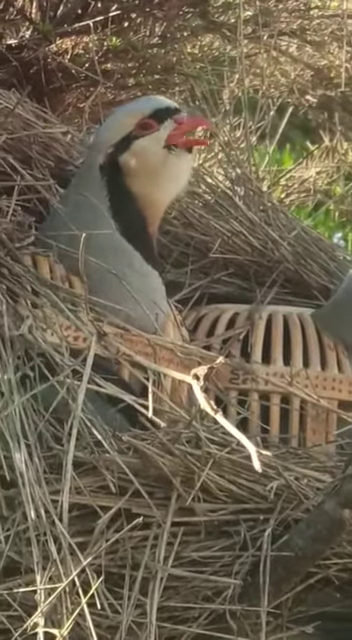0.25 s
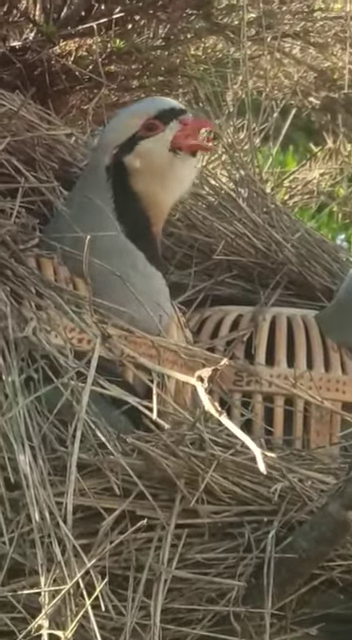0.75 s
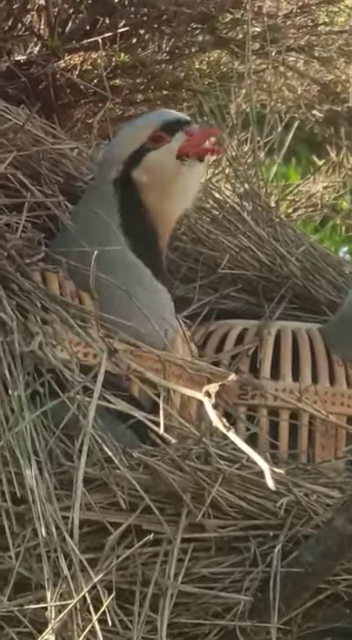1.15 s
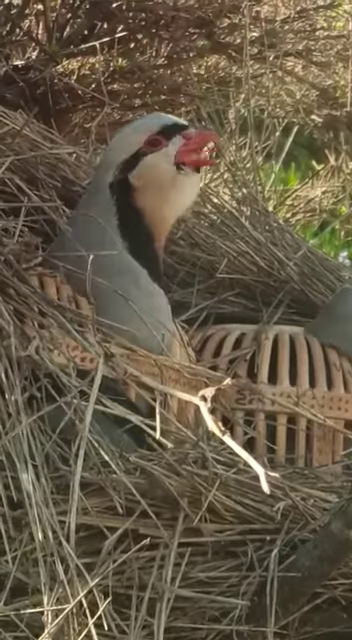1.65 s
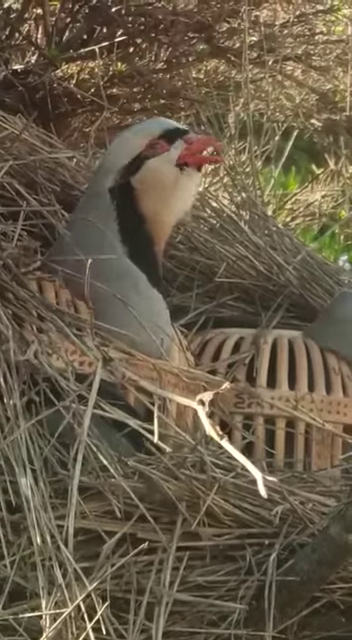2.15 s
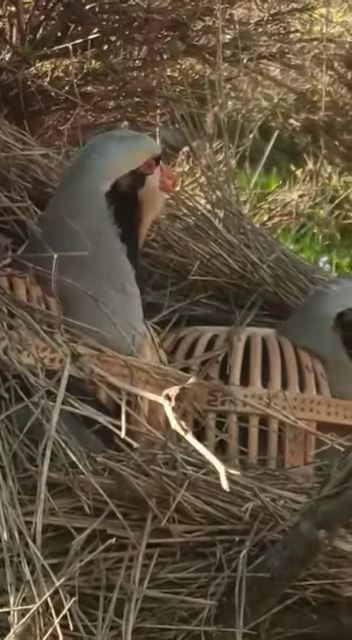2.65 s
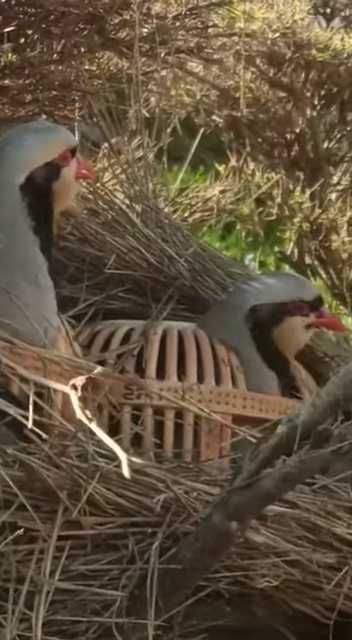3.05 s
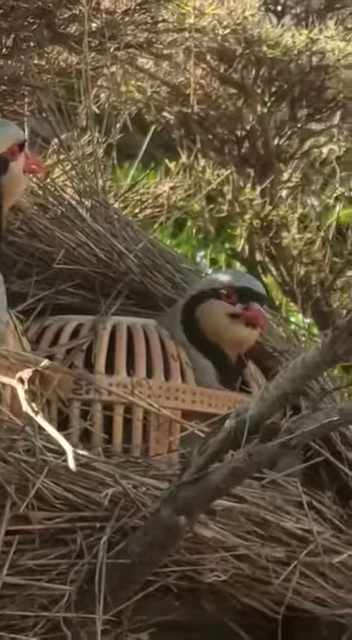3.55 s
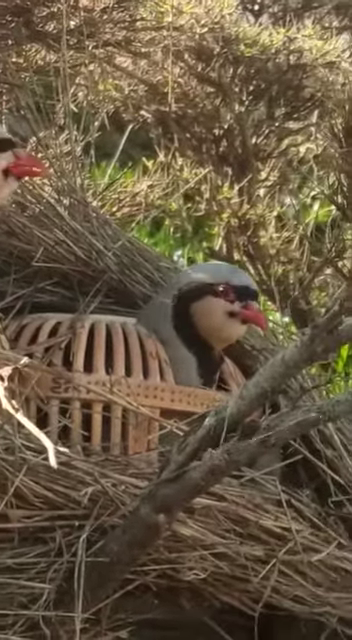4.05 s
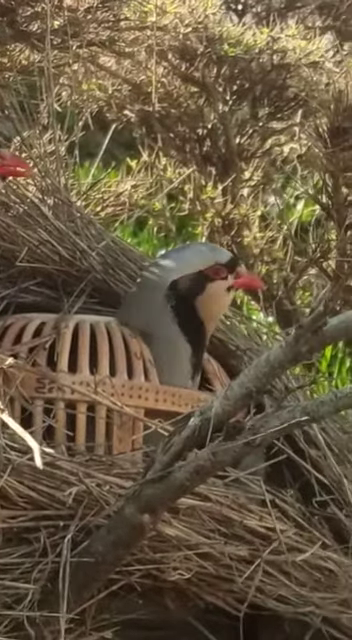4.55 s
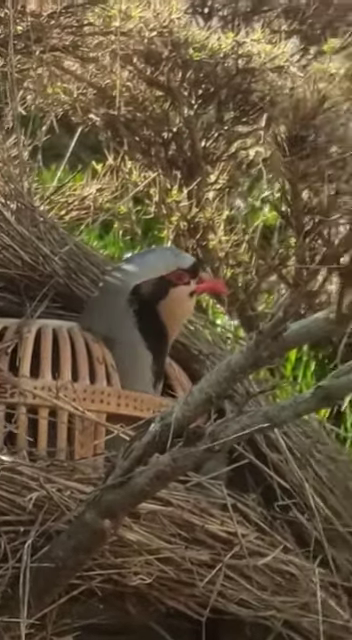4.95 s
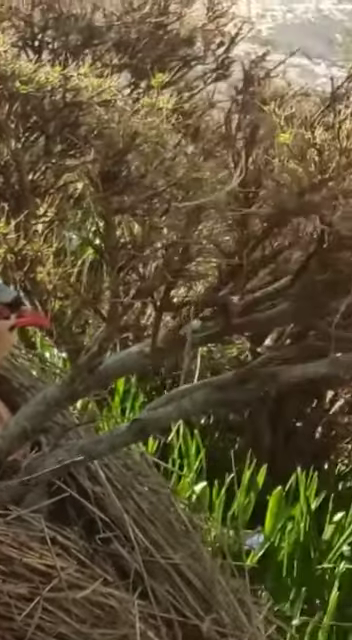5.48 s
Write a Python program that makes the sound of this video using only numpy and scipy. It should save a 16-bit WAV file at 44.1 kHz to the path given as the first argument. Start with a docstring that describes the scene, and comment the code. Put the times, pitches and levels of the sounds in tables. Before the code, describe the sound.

From 0 to 1.9 s a nearby partridge fires loud, hollow, throaty chucks, each under a tenth of a second, evenly spaced at nearly six per second; mid-run notes get a rougher upward push before falling. Low breeze rumbles softly underneath, fading by 2 s. Around 1.9-2.4 s the rhythm breaks into grunts, a rising growl, one more strong chuck and a weaker one. At 2.6-2.9 s comes a quiet growl climbing into a cackle. Small yelps and squeals at 2.9-3.3 s and low chatter near 3.5 s follow. From 3.8 s the second bird calls at about 3.8, 4.2, 4.6, 5.1 and 5.4 s: scratchy rasp, warbling squeal, yelp, falling hoarse buzz. A soft cluck sits near 4.95 s. Very faint distant pips occur after 4.4 s; straw rustles lightly at the end. The space is open and dry, with tight reflections from twigs and cage slats.

```python
"""A dry hillside with two chukar partridges: the near cock fires loud hollow chucks that slow into growls.
The second bird answers with rasps that break into squealing whistles, and soft clucks.
Each voice is a train of syrinx pulses filtered by throat and bill; squeals are warbling sines with undertones.
Cage slats, twigs and scrub reflect the calls; distant birds pip, straw rustles and a light breeze rumbles.
A microphone filter and a fast limiter, which holds down the loudest notes, follow."""
import sys
import numpy as np
from scipy import signal
from scipy.fft import rfft, irfft
from scipy.io import wavfile
from scipy.ndimage import uniform_filter1d, minimum_filter1d, map_coordinates

SR = 44100
rng = np.random.default_rng(int(sys.argv[2]) if len(sys.argv) > 2 else 0)


def to_wav(sig):
    """Store sig (one row per channel, or 1-D mono) as 16-bit WAV at the path in sys.argv[1].

    Samples outside -1..1 are clipped; the rate is SR.
    """
    pcm = np.clip(np.atleast_2d(sig), -1, 1) * 32767
    pcm = np.round(pcm).astype(np.int16)
    wavfile.write(sys.argv[1], SR, pcm.T)  # frames by channels


N = 252252  # samples
TOP_HZ = 15800  # upper band limit


def amp(db):
    """Decibel law: a level in dB becomes an amplitude ratio."""
    return 10 ** (np.asarray(db) / 20)


def unit(x):
    """Normalisation to an rms of one."""
    return x / np.sqrt(np.mean(x ** 2) + 1e-20)


def wobble(count, rate):
    """Band-limited fluctuation: a smooth random curve with rate knots a second."""
    knots = rng.standard_normal(int(count * rate / SR) + 4)
    return map_coordinates(knots, [np.arange(count) * rate / SR], mode="mirror")


def colour(x, points, size=2048):
    """Minimum-phase resonance: a causal filter through (Hz, dB) points, whose peaks ring after each pulse."""
    hz, db = np.transpose(points)
    shape = np.interp(np.log(np.fft.rfftfreq(size, 1 / SR) + 1), np.log(hz), db)
    # folding the cepstrum onto positive times makes the filter causal
    cepstrum = irfft(np.log(amp(uniform_filter1d(shape, size=5))))
    cepstrum[1:size // 2] *= 2
    cepstrum[size // 2 + 1:] = 0
    impulse_response = irfft(np.exp(rfft(cepstrum)))
    return signal.fftconvolve(x, impulse_response)


def add(track, s, sound, length, db):
    """Superposition: lay a note into the track at s seconds, scaled to its rms level over its length."""
    sound = sound * amp(db) / np.sqrt(np.sum(sound ** 2) / (length * SR))
    start = round(s * SR)
    sound = sound[max(-start, 0):N - start]
    track[max(start, 0):][:len(sound)] += sound


def swell(u, attack, release):
    """Pressure envelope: air opens and closes the note over the given shares of its length."""
    nearest_end = np.minimum(u / attack, (1 - u) / release)
    return np.sin(np.pi / 2 * np.clip(nearest_end, 0, 1))


def arch(u, middle, sweep):
    """Pressure-dependent pitch: a glide that sags at both ends, where the pressure is low."""
    return middle * (1 - 0.27 * (u - .5) ** 2) + sweep * (u - .5)


def syrinx(pitch, rough, pressure, doubling=0):
    """Membrane oscillation: one smeared pulse a cycle, duller at weak pressure, with optional period doubling.

    Roughness shakes the pitch, beads the level and frays the upper harmonics.
    """
    count = len(pitch)
    jitter = 1 + .11 * rough * wobble(count, 260)
    phase = 2 * np.pi * np.cumsum(pitch * jitter) / SR
    k = np.arange(1, int(TOP_HZ / pitch.min()) + 1)[:, None]
    hz = k * pitch
    # each harmonic trades its steady part for a random one
    fray = np.minimum(rough * np.sqrt(hz / 1300), 1)
    chaos = np.array([wobble(count, 380) + 1j * wobble(count, 380) for _ in k]) / np.sqrt(2)
    smear = rng.normal(0, 1.2, k.shape)  # radians
    carrier = np.exp(1j * (k * phase + smear))
    harmonics = np.real((np.sqrt(1 - fray ** 2) + fray * chaos) * carrier)
    loudness = pressure ** (1 + np.minimum(hz / 7000, 1))
    flutter = amp((1 + 2 * rough) * wobble(count, 240))
    # doubling makes alternate cycles unequal in fits
    depth = 2 * doubling * rough * (1 + .5 * wobble(count, 300))
    alternate = 1 + depth * np.cos(phase / 2 + wobble(count, 300))
    return flutter * alternate * np.sum(harmonics * loudness * (hz < TOP_HZ), axis=0)


def syllables(rows, throat, attack, release, doubling=0):
    """Source-filter voice: short hoarse glides through a throat, brighter the harder the bird pushes."""
    track = np.zeros(N)
    for s, length, db, middle, sweep, rough in rows:
        u = np.linspace(0, 1, int(length * SR))
        pressure = swell(u, attack, release) * amp(db + 6.5)
        source = syrinx(arch(u, middle, sweep), rough, pressure, doubling)
        add(track, s, colour(source, throat), length, db)
    return track


# the cock's run of chucks: start_s, length_s, level_db
CHUCK_NOTES = [(-.036, 0.062, -12.5), (0.141, 0.047, -4.5), (0.303, 0.056, -6.5), (0.475, 0.073, -6.5),
               (0.656, 0.069, -7.5), (0.831, 0.078, -8), (1.013, 0.076, -7.5), (1.189, 0.078, -8),
               (1.371, 0.076, -8), (1.545, 0.076, -9.5), (1.719, 0.072, -6.5), (1.893, 0.049, -9.5),
               (2.197, 0.041, -4.5), (2.381, 0.041, -15.5)]
# course of one chuck: place (0-1), pitch (ratio to held pitch), effort_db, roughness (0-1, before the push)
CHUCK_COURSE = [(0, .95, -8, .8), (.14, 1, 0, .55), (.28, 1.01, 0, .25), (.55, 1.01, 0, .16),
                (.73, .97, -.5, .14), (.84, .83, -7, .2), (1, .53, -12, .3)]
# over the run the push comes later in the note and grows, then he tires:
# start_s, held_pitch_hz, lift_hz, push_place (0-1)
CHUCK_RUN = [(0, 415, 25, .14), (.66, 422, 30, .16), (.83, 412, 80, .44), (1.72, 412, 110, .5),
             (1.89, 400, 30, .2), (2.2, 405, 20, .1), (2.38, 372, 20, .2)]
# hollow resonances of throat and bill: frequency_hz, gain_db
HOLLOW_THROAT = [(200, -13.5), (440, -21.5), (600, -15.5), (850, -4.5), (1060, 1.5), (1200, 13),
                 (1320, 4.5), (1570, -24.5), (2250, -29), (3100, -24), (3980, -2), (4300, -19.5),
                 (5200, -48), (6500, -7.5), (7500, -36)]
# resonances of the tightened throat: frequency_hz, gain_db
TIGHT_THROAT = [(250, -20), (560, -16), (820, 3.5), (1150, -4), (1330, -4), (1650, -30.5), (2600, -17),
                (3050, -15), (3500, -3), (4100, -2.5), (5200, -39), (6650, -1.5), (7900, -32)]
FALL_AT, FALL_S = .7, 0.025  # place where the closing fall starts; its time, the same in every chuck
PUSH_CHOKE_DB_PER_HZ = .02


def chucks():
    """Resonance tuning: a harmonic booms on the lowest throat peak until a rough push lifts it off and tightens."""
    track = np.zeros(N)
    place, *course = np.transpose(CHUCK_COURSE)
    times, *run = np.transpose(CHUCK_RUN)
    for s, length, db in CHUCK_NOTES:
        held_hz, lift_hz, push_at = (np.interp(s, times, c) for c in run)
        t = np.arange(0, length, 1 / SR)
        u = np.interp(t, [0, length - FALL_S, length], [0, FALL_AT, 1])
        bend, effort_db, rough = (np.interp(u, place, c) for c in course)
        lift = lift_hz * np.exp(-((u - push_at) / 0.14) ** 2)
        pressure = swell(u, 0.07, 0.03) * amp(effort_db - PUSH_CHOKE_DB_PER_HZ * lift)
        source = syrinx(held_hz * bend + lift, rough + 2 * lift / held_hz, pressure)
        tight = np.clip(lift / 170, 0, 1)
        voice = colour(source * (1 - tight), HOLLOW_THROAT) + colour(source * tight, TIGHT_THROAT)
        add(track, s, voice, length, db)
    return track


# resonances of the relaxed throat: frequency_hz, gain_db
RELAXED_THROAT = [(300, -23.5), (560, -15.5), (800, 7), (1350, 0.5), (1650, -22), (2500, -14),
                  (2900, -18.5), (3450, -10.5), (4650, -7), (5500, -30.5), (6600, -2.5), (7900, -24.5)]
RELAX_AT_S = 2.5


def throat_at(s):
    """Wall tension: the cock's throat stays tight through the run of chucks, and relaxes after it."""
    return TIGHT_THROAT if s < RELAX_AT_S else RELAXED_THROAT


# the cock's short grunts: start_s, length_s, level_db, pitch_hz (mid-note)
GRUNT_NOTES = [(1.925, 0.032, -20.5, 337), (2.036, .024, -24.5, 391), (2.068, .037, -27, 371.4),
               (2.566, 0.031, -27.5, 396), (3.605, .037, -28, 541)]
# drawn-out growls, then a short cackle, one curve each: time_s, pitch_hz, level_db, roughness (0-1)
GROWL_CURVES = [
    [(2.106, 385, -17.5, .7), (2.21, 503.2, -10.5, 0.8)],
    [(2.607, 380, -28, .6), (2.69, 400, -21.5, .42), (2.735, 470, -20.5, .65), (2.77, 620, -20.5, .6),
     (2.82, 660, -21.5, .42), (2.835, 800, -27, .15), (2.856, 590, -18, .25), (2.872, 470, -33, .3)],
    [(3.417, 527, -25.5, 0.4), (3.429, 596, -20.5, 0.5), (3.443, 527, -19.5, 0.3), (3.462, 557, -34.5, 0.4)],
]
# resonances of the throat behind a nearly shut bill: frequency_hz, gain_db
SHUT_BILL = [(250, -19.5), (560, -6), (760, 6), (1000, -5.5), (1350, -4), (1650, -24.5), (4200, -11),
             (5200, -17.5), (7000, -21.5)]
# pitches between which the bill opens: pitch_hz
BILL_OPENING_HZ = [400, 500]
GRUNT_SWEEP_HZ, GRUNT_ROUGH = -39, .55


def growls():
    """Irregular vibration: grunts, growls and cackle, rough and low, with a bill that opens as pitch climbs."""
    track = np.zeros(N)
    for s, *note in GRUNT_NOTES:
        row = (s, *note, GRUNT_SWEEP_HZ, GRUNT_ROUGH)
        track += syllables([row], throat_at(s), attack=0.87, release=0.22)
    for curve in GROWL_CURVES:
        s, hz, db, rough = np.transpose(curve)
        t = np.arange(s[0], s[-1], 1 / SR)
        level_db = np.interp(t, s, db)
        pressure = swell(np.linspace(0, 1, len(t)), 0.031, 0.018) * amp(level_db + 9.5)
        pitch = np.interp(t, s, hz)
        source = syrinx(pitch, np.interp(t, s, rough), pressure)
        # only after the throat relaxes does the bill follow the pitch
        opening = np.interp(pitch, BILL_OPENING_HZ, [0, 1]) if s[0] > RELAX_AT_S else 1
        voice = colour(source * opening, throat_at(s[0])) + colour(source * (1 - opening), SHUT_BILL)
        add(track, s[0], voice, s[-1] - s[0], level_db.mean())
    return track


def steps(rows, shape):
    """Register change: stretch one sequence of registers over each rasp."""
    return [(s + start * length, share * length, db + step_db, *voice)
            for s, length, db in rows
            for start, share, step_db, *voice in shape]


# the second bird's opening rasps: start_s, length_s, level_db (before the step level)
OPENING_RASPS = [(3.814, .036, -19.5), (4.155, .033, -19), (4.552, .04, -16), (5.076, 0.017, -28),
                 (5.386, 0.025, -20), (5.543, 0.024, -17.5)]
# an opening climbs in two steps:
# start (share of length), length (share), step_level_db, pitch_hz (mid-note), sweep_hz, roughness (0-1)
OPENING_STEPS = [(0, 0.73, -3, 682, 74.9, 0.5), (0.481, 0.47, -0.5, 842.6, 186.6, 0.3)]
# closing rasps: start_s, length_s, level_db (before the step level)
CLOSING_RASPS = [(1.113, 0.026, -35), (2.974, 0.028, -30.5), (3.303, 0.046, -29.5), (3.932, 0.047, -19),
                 (4.322, 0.046, -19.5), (4.711, 0.049, -17.5), (5.156, 0.066, -22.5), (5.565, 0.054, -18.5)]
# a closing drops from a harsh register to a clear falling buzz:
# start (share of length), length (share), step_level_db, pitch_hz (mid-note), sweep_hz, roughness (0-1)
CLOSING_STEPS = [(0, .68, -1, 640, -60, .55), (.4, .7, 0, 415, -70, .27)]
# chatter between calls: start_s, length_s, level_db
CHATTER_NOTES = [(3.456, .05, -33.5), (3.5, .026, -29.5), (3.523, 0.023, -22), (3.548, .023, -21.5),
                 (3.583, 0.018, -27.5)]
# yelps sliding up from one pitch: start_s, length_s, level_db, end_hz (before the sag at both ends)
YELP_NOTES = [(2.911, 0.024, -20, 1920), (2.952, 0.023, -29.5, 1430), (3.183, .024, -21, 1957),
              (3.272, 0.018, -27.5, 1566), (3.901, 0.057, -25, 1355), (4.304, 0.031, -17.5, 1727),
              (4.697, .018, -15.5, 1794), (5.083, .02, -21.5, 1585), (5.13, 0.027, -23, 1683),
              (5.407, .016, -15, 1980)]
# harsh resonances of the second bird's throat: frequency_hz, gain_db
HARSH_THROAT = [(400, -22.5), (620, -9.5), (860, -15.5), (1350, -1), (1560, -13.5), (2050, 4), (2650, -2),
                (3400, 5), (4150, 4), (5100, -12.5), (6800, -2.5), (8000, -12.5)]
# the same throat as its bill closes: frequency_hz, gain_db
BUZZ_THROAT = [(380, -11.5), (600, -16), (860, 1.5), (1260, -3.5), (1600, -12.5), (2080, 4.5), (2550, -9.5),
               (3350, 2.5), (4100, -0.5), (5100, -17), (6900, -6), (8000, -18)]
CHATTER_HZ, CHATTER_SWEEP_HZ, CHATTER_ROUGH = 680, 110, .45
YELP_START_HZ, YELP_ROUGH = 1270, .5  # start before the sag


def rasps():
    """Period doubling: harsh openings and yelps alternate their cycles; closings and chatter only buzz."""
    openings = steps(OPENING_RASPS, OPENING_STEPS)
    closings = steps(CLOSING_RASPS, CLOSING_STEPS)
    chatter = [(*row, CHATTER_HZ, CHATTER_SWEEP_HZ, CHATTER_ROUGH) for row in CHATTER_NOTES]
    yelps = [(s, length, db, (YELP_START_HZ + end_hz) / 2, end_hz - YELP_START_HZ, YELP_ROUGH)
             for s, length, db, end_hz in YELP_NOTES]
    return (syllables(openings + yelps, HARSH_THROAT, attack=0.58, release=.22, doubling=.4)
            + syllables(closings, BUZZ_THROAT, attack=0.18, release=0.28)
            + syllables(chatter, BUZZ_THROAT, attack=0.49, release=.2))


# squeals arching up and back: start_s, length_s, level_db, top_hz (before the sag), undertones_db
SQUEAL_NOTES = [(2.925, .024, -19.5, 2644, 2.5), (3.212, .023, -25, 2640, -31),
                (3.244, .018, -28.5, 2540, -29), (3.839, 0.064, -25.5, 2700, -3.5),
                (4.18, 0.03, -19.5, 2833, -16), (4.224, 0.052, -24.5, 2680, -6),
                (4.288, .019, -20.5, 2530, -4), (4.587, 0.016, -15.5, 3785, -13),
                (4.605, 0.058, -23, 2666, -2), (4.674, .017, -20.5, 2620, -3),
                (5.1, 0.025, -16.5, 3683, -24), (5.41, 0.067, -22.5, 2633, -16.5),
                (5.485, 0.018, -21, 2647, -13), (5.513, .021, -17, 2620, -33)]
SQUEAL_EDGE_HZ, SQUEAL_GLIDE_S = 2100, .009  # pitch at both ends before the sag; time to glide
SQUEAL_SAG_HZ_PER_S, SQUEAL_FADE_DB_PER_S = 3200, 70


def squeals():
    """Subharmonics: a warbling squeal sags, fades and, as it tires, repeats every third swing as undertones."""
    track = np.zeros(N)
    thirds = [(1, -18), (2, 0), (4, -5), (5, -7), (7, -18), (8, -15)]  # (multiple of pitch / 3, dB)
    for s, length, db, top_hz, under_db in SQUEAL_NOTES:
        count = int(length * SR)
        u = np.linspace(0, 1, count)
        glide = SQUEAL_GLIDE_S / length
        rise = (top_hz - SQUEAL_EDGE_HZ) * swell(u, glide, glide)
        pitch = SQUEAL_EDGE_HZ + rise - SQUEAL_SAG_HZ_PER_S * length * (u - .5)
        warble = 1 + .018 * wobble(count, 90) + .012 * wobble(count, 700)
        phase = 2 * np.pi * np.cumsum(pitch * warble) / SR
        tone = np.sin(phase) + amp(-13) * np.sin(2 * phase) + amp(-20) * np.sin(5 * phase)
        under = np.zeros(count)
        for k, level_db in thirds:
            fitful = amp(level_db + 4 * wobble(count, 130))
            under += fitful * np.sin(k * phase / 3 + k / 4 * wobble(count, 300))
        growing_under = amp(under_db) * under * np.sin(np.pi / 2 * u)
        hiss = unit(colour(rng.standard_normal(count), HARSH_THROAT)[:count])
        fade_db = 1.5 * wobble(count, 110) - SQUEAL_FADE_DB_PER_S * length * u
        pressure = swell(u, glide, glide) * amp(fade_db)
        add(track, s, (tone + growing_under + amp(-15) * hiss) * pressure, length, db)
    return track


# soft clucks: start_s, length_s, level_db
CLUCK_NOTES = [(4.909, 0.033, -32.5), (4.96, 0.035, -21), (5.615, 0.045, -36)]
CLUCK_HZ, CLUCK_ROUGH = 439.6, 0.57  # mid-note pitch; roughness 0-1


def clucks():
    """Closed-tract filtering: soft notes without a sweep, through a nearly shut bill."""
    rows = [(*row, CLUCK_HZ, 0, CLUCK_ROUGH) for row in CLUCK_NOTES]
    return syllables(rows, SHUT_BILL, attack=0.62, release=0.078)


CAGE_DELAY_S, CAGE_DB = .00135, -14.5


def cage(voices):
    """Comb filtering: slats beside the birds throw back the treble, which cuts a row of notches into it."""
    highpass = signal.butter(2, 1900, "high", fs=SR, output="sos")
    treble = signal.sosfiltfilt(highpass, voices)
    reflection = np.pad(treble, (round(CAGE_DELAY_S * SR), 0))[:N]
    return voices - amp(CAGE_DB) * reflection


def hillside(voices):
    """Diffuse reflection: twigs and straw close by scatter the calls; the scrub beyond adds a faint echo."""
    t = np.arange(SR // 2) / SR
    scatter = unit(rng.standard_normal(len(t)) * t * amp(-60 * t / 0.023))
    echo = unit(rng.standard_normal(len(t)) * amp(-60 * t / 0.23))  # falls 60 dB in 0.23 s
    response = (amp(-13.5) * scatter + amp(-39.5) * echo) / np.sqrt(len(t))
    return signal.fftconvolve(voices, response)[:N]


# small birds far off: start_s, length_s, level_db, first_hz, last_hz
PIP_NOTES = [(4.375, 0.057, -56.5, 4750, 4350), (4.998, .065, -46.5, 8500, 5460),
             (5.232, .07, -69, 3460, 2750)]


def pips():
    """Frequency glide: distant small birds as thin falling sines."""
    track = np.zeros(N)
    for s, length, db, first, last in PIP_NOTES:
        pitch = np.geomspace(first, last, int(length * SR))
        tone = np.sin(2 * np.pi * np.cumsum(pitch) / SR)
        add(track, s, tone * np.hanning(len(pitch)), length, db)
    return track


# course of the straw's rustle: time_s, level_db (before the uneven flutter)
RUSTLE_COURSE = [(5.58, -62), (5.72, -39)]
# spectrum of dry straw: frequency_hz, relative density (dB per Hz)
STRAW_SPECTRUM = [(300, -8.5), (2000, -3.5), (7000, -19)]


def rustle():
    """Friction noise: a soft uneven swish of dry straw, as shaped noise."""
    level_db = np.interp(np.arange(N) / SR, *np.transpose(RUSTLE_COURSE)) + 2.5 * wobble(N, 80)
    return amp(level_db) * unit(colour(rng.standard_normal(N), STRAW_SPECTRUM)[:N])


# spectrum of the outdoor hush: frequency_hz, relative density (dB per Hz)
HUSH_SPECTRUM = [(38, -31), (72, 8), (130, -3.5), (350, -12), (1250, -20.5), (2000, -41), (6500, -37.5)]
# course of the breeze: time_s, level_db
BREEZE_COURSE = [(0, -31.5), (1.5, -37), (2, -62)]


def air():
    """Turbulence noise: a steady outdoor hush, and lumps of breeze rumbling on the microphone."""
    hush = amp(-45.0) * unit(colour(rng.standard_normal(N), HUSH_SPECTRUM)[:N])
    low_band = signal.butter(3, [75, 180], "band", fs=SR, output="sos")
    rumble = signal.sosfilt(low_band, rng.standard_normal(N))
    breeze_db = np.interp(np.arange(N) / SR, *np.transpose(BREEZE_COURSE))
    return hush + amp(breeze_db) * unit(rumble * amp(5.1 * wobble(N, 20)))


def scene():
    """Superposition: the caged voices, their reflections and the background sum to one channel."""
    voices = cage(chucks() + growls() + rasps() + squeals() + clucks())
    return (voices + hillside(voices) + pips() + rustle() + air())[None]


# microphone response: frequency_hz, gain_db
MICROPHONE_RESPONSE = [(7300, 0.5), (8900, -23.5), (10900, -27), (11700, -1.5), (13300, -9.5), (14900, -3),
                       (16000, -9)]


def record(dry):
    """Transducer response and gain reduction: microphone colour, a fast limiter and the band limit."""
    x = colour(dry[0], MICROPHONE_RESPONSE)[:N]
    needed = np.minimum(1, 0.87 / (np.abs(x) + 1e-9))
    # hold the lowest gain for 90 samples, then smooth it over 60
    gain = uniform_filter1d(minimum_filter1d(needed, size=90), size=60)
    passband = np.fft.rfftfreq(N, 1 / SR) < TOP_HZ
    return irfft(rfft(x * gain) * passband, N)[None]


dry = scene()
out = record(dry)
to_wav(out)
```